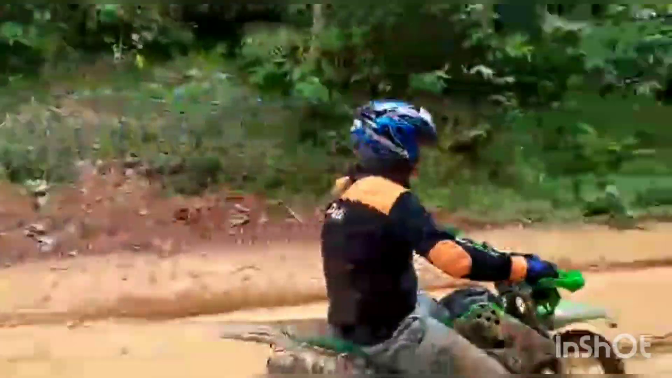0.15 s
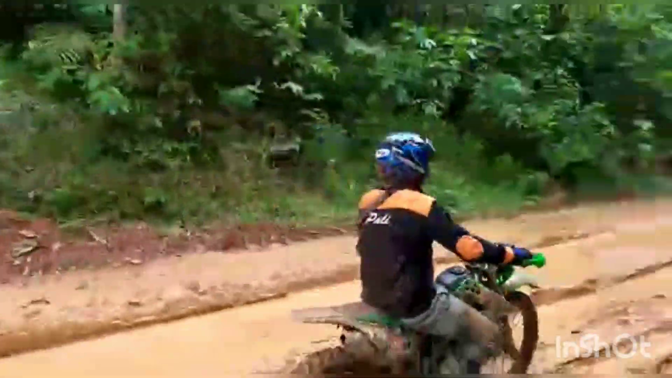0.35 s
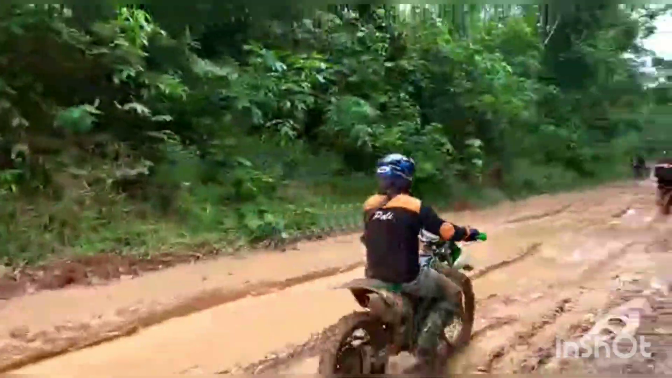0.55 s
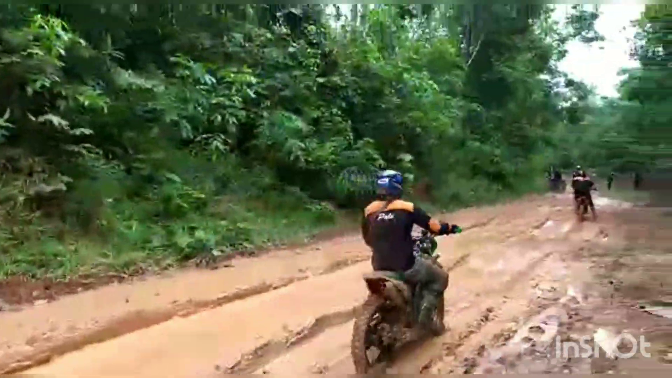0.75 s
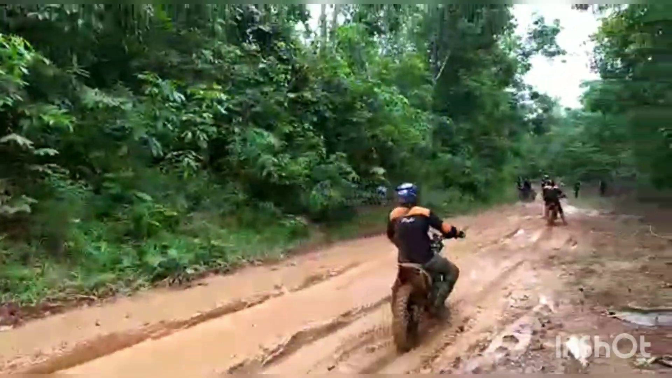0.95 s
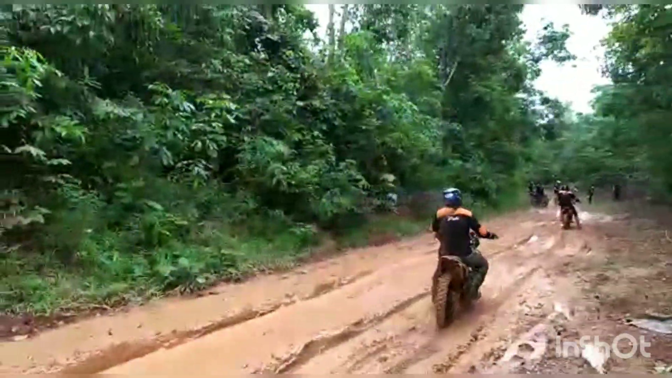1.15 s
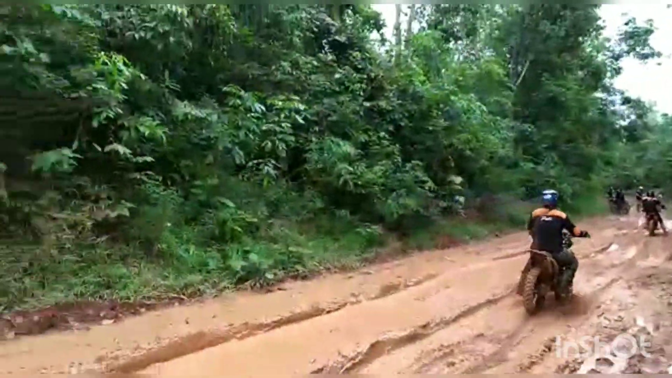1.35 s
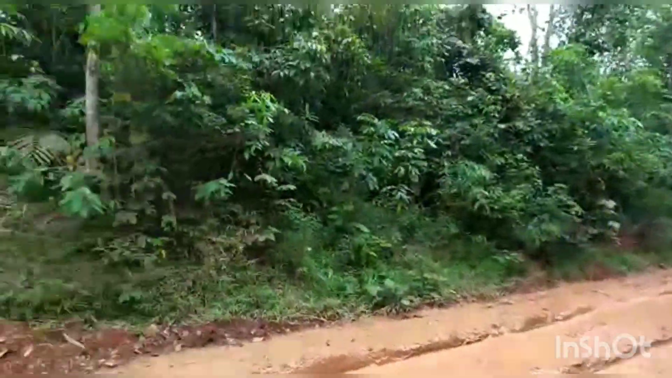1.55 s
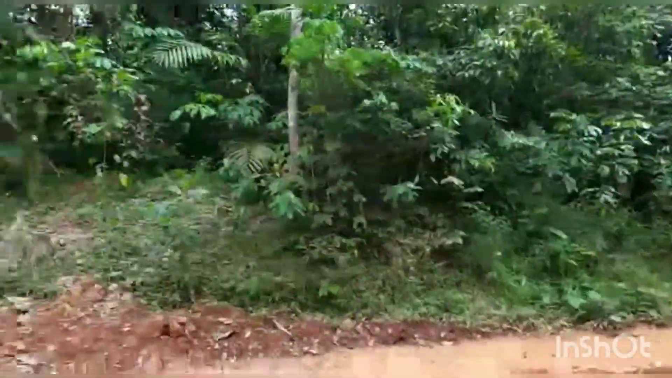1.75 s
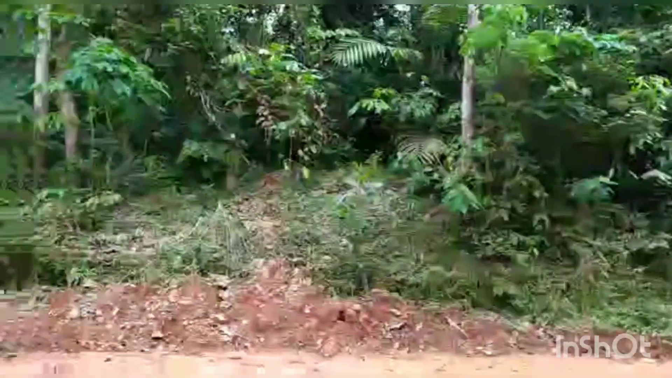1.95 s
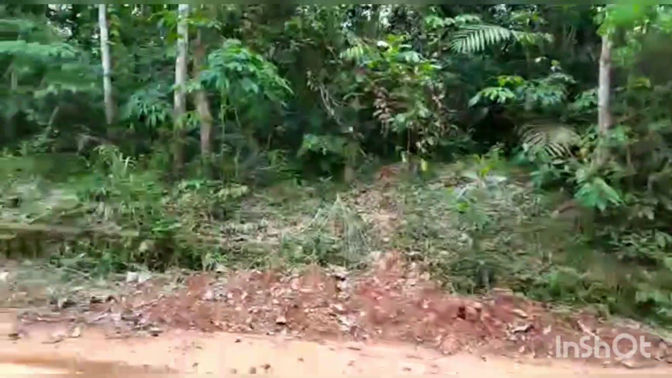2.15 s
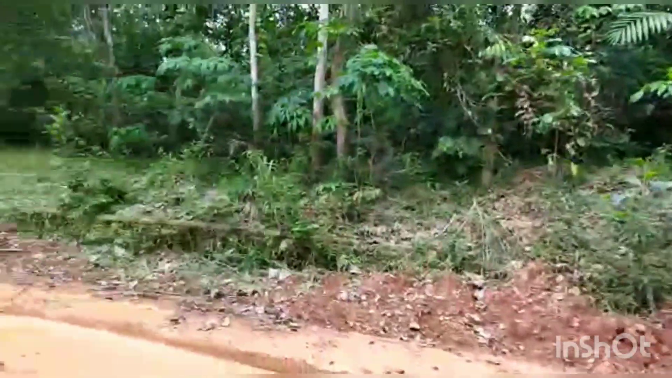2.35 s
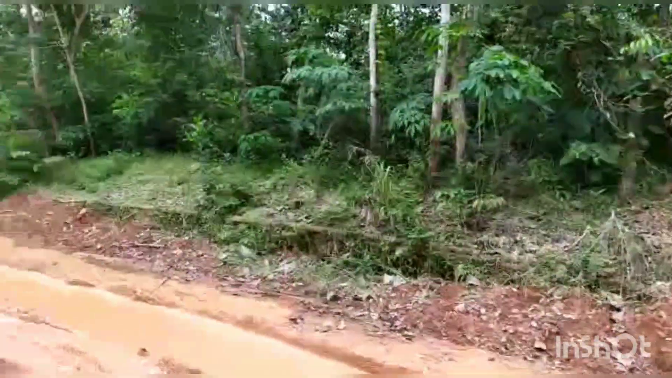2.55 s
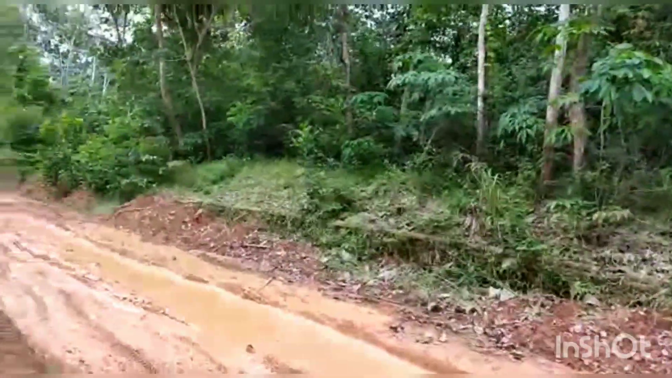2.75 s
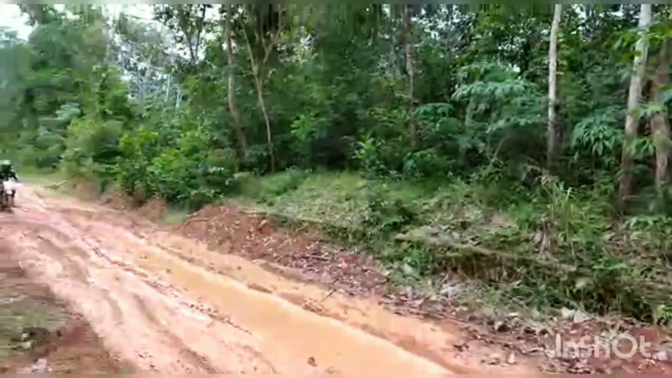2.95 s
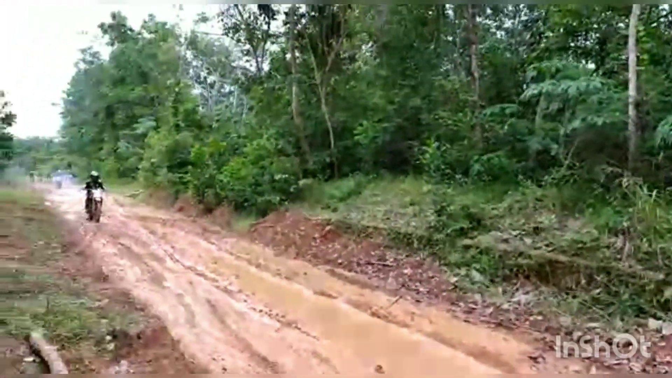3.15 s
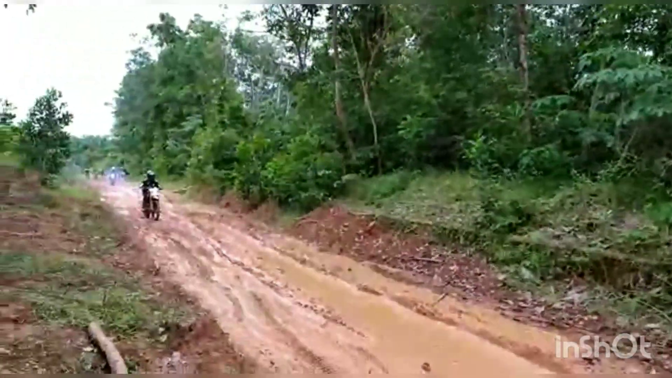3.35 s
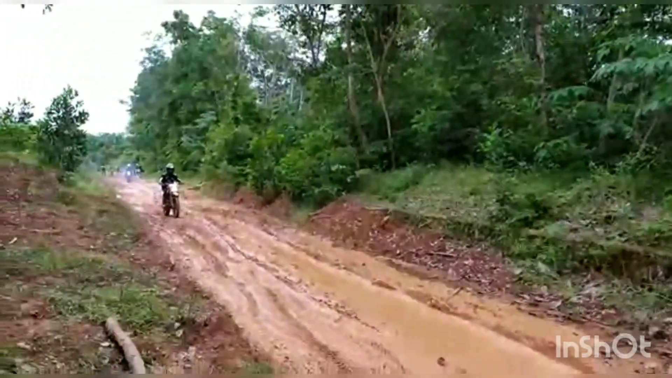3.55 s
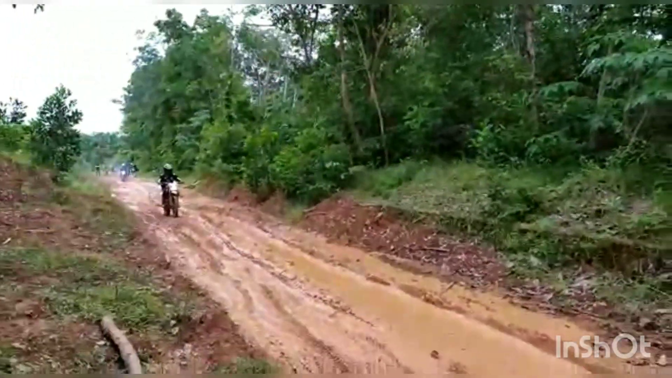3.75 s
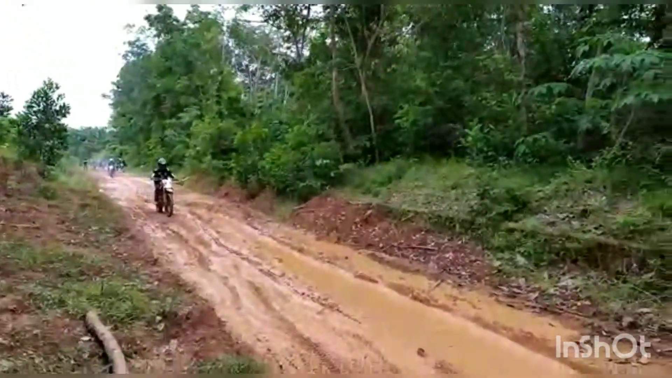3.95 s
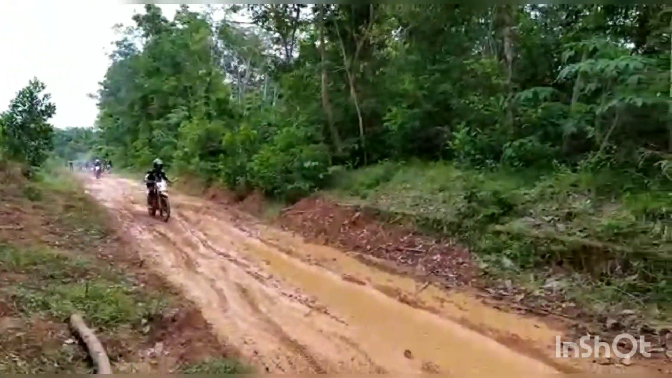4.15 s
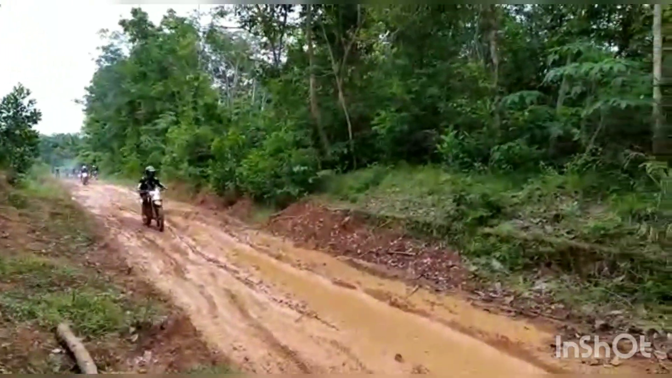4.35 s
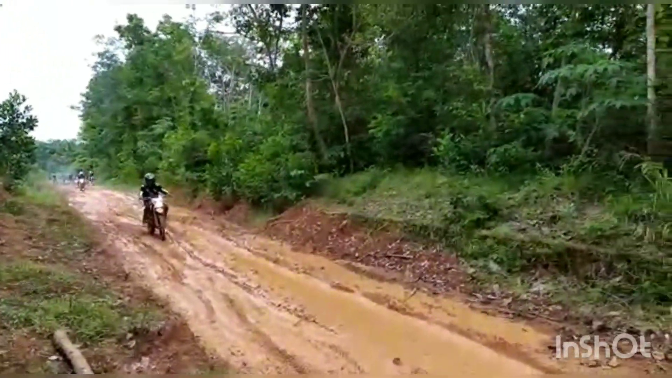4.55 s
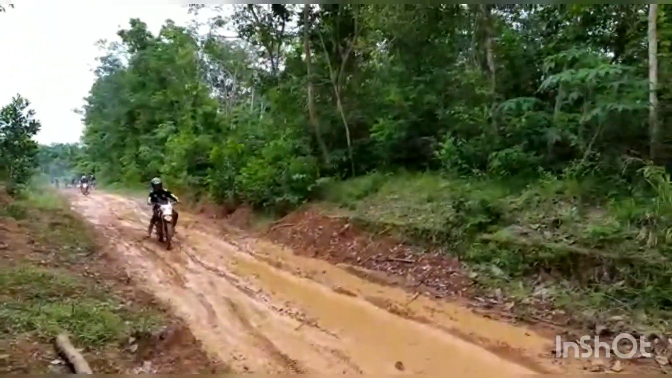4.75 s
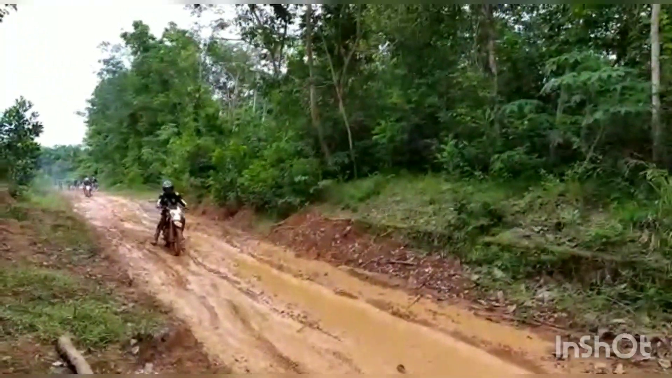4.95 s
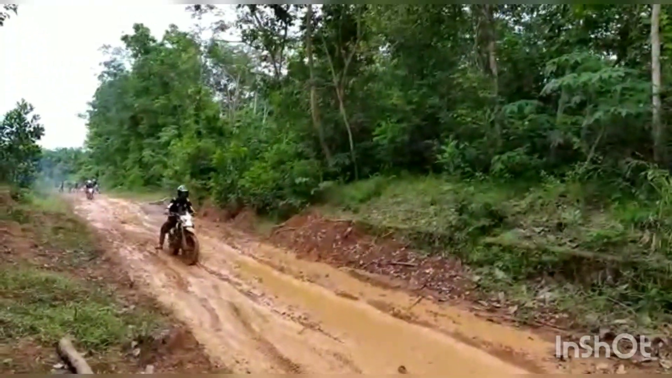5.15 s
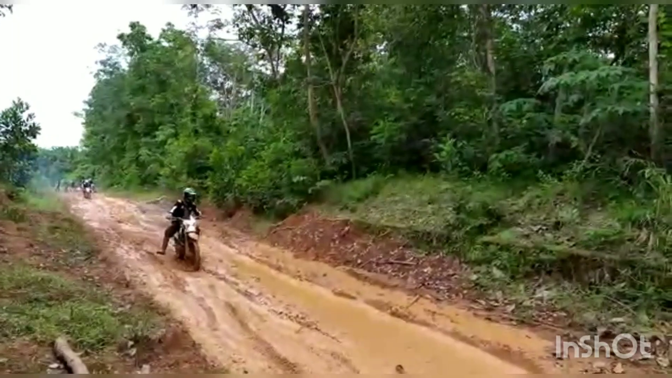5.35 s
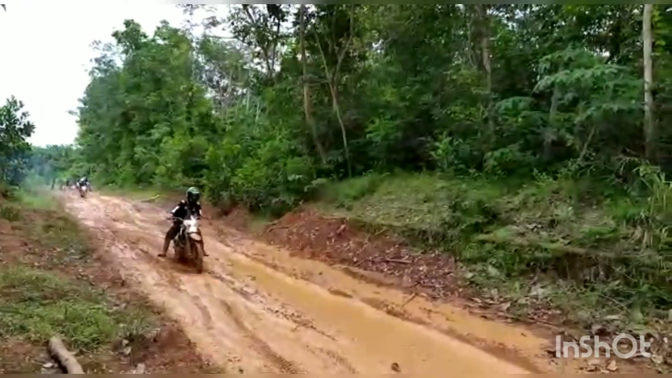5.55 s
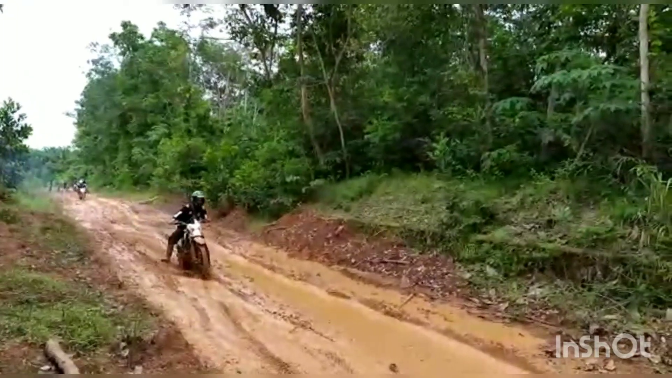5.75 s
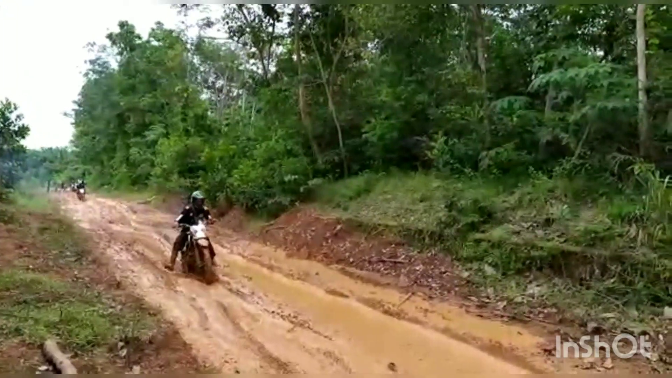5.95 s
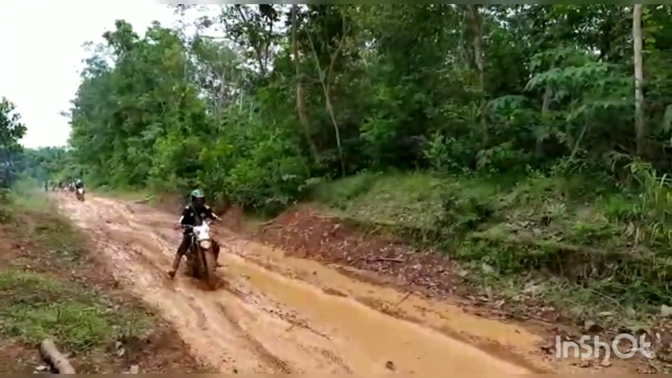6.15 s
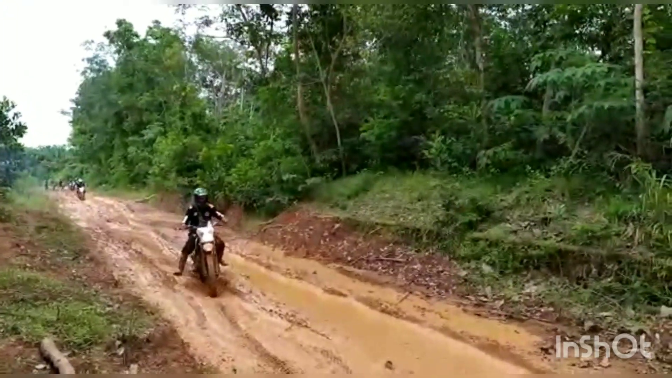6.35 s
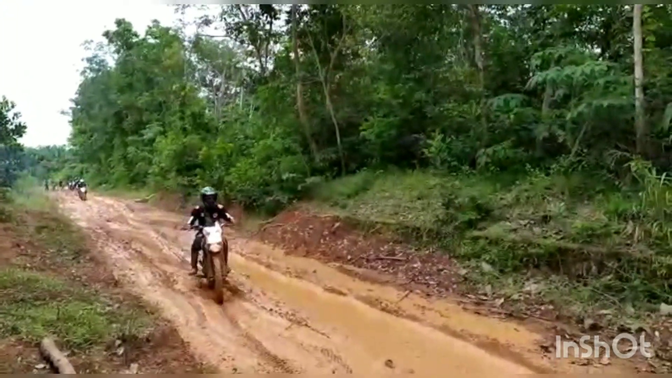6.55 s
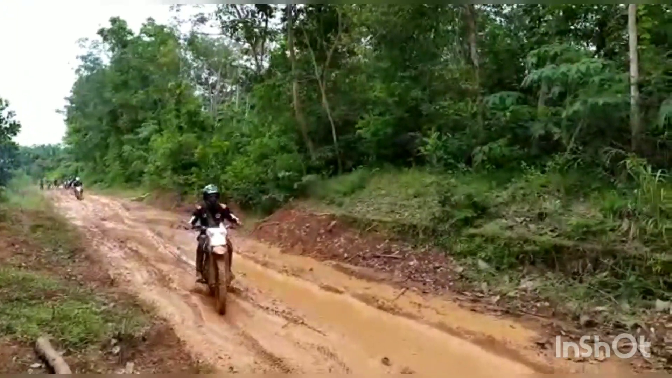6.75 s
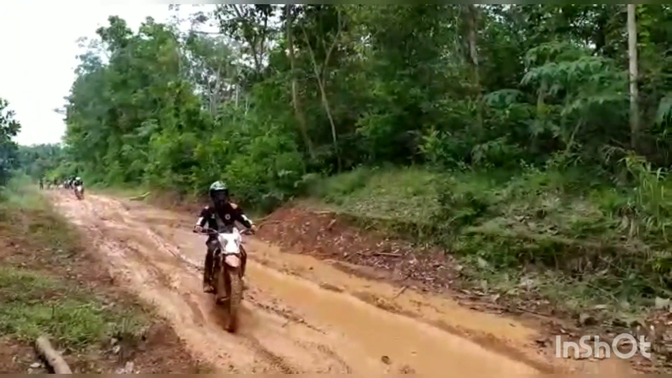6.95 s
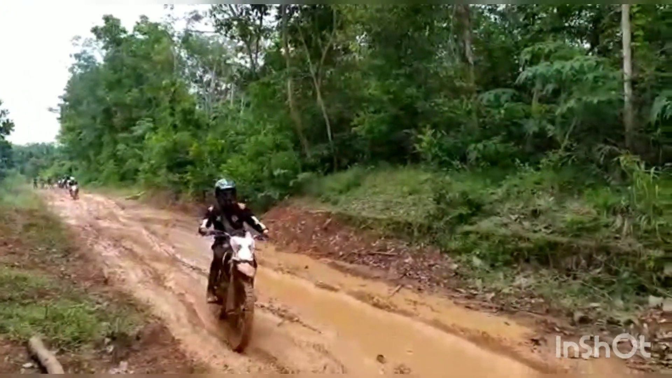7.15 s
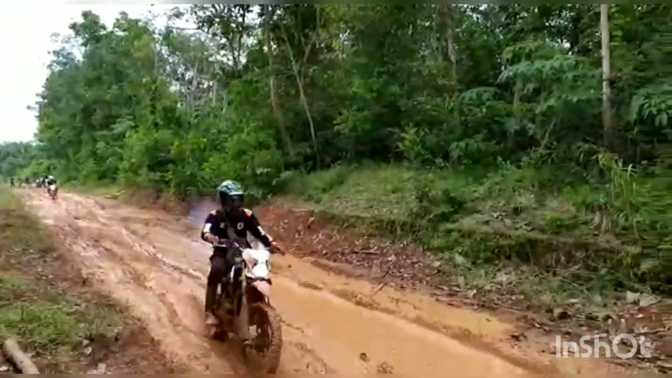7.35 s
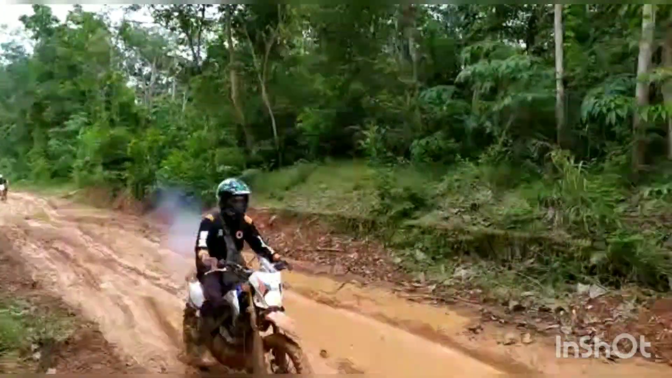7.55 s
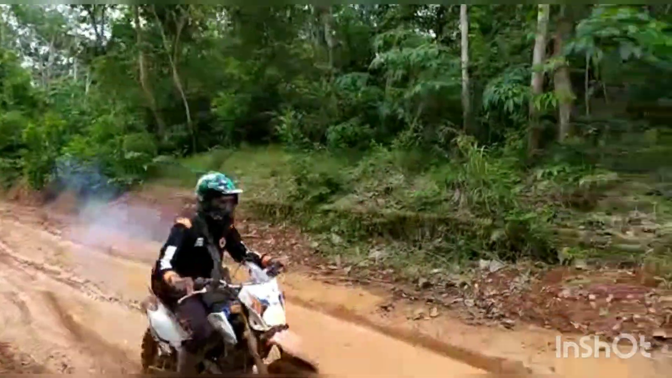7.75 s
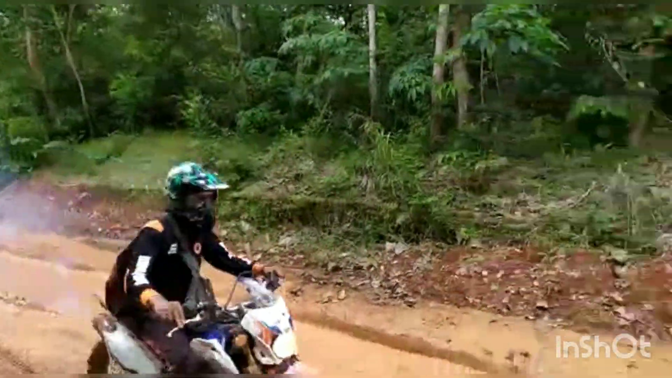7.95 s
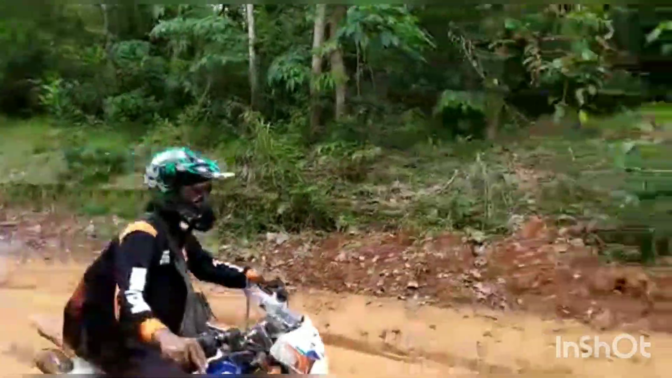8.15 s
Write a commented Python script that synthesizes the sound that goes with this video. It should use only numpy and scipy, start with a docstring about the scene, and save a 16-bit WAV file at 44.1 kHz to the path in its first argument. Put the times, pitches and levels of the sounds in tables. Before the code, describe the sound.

Outdoors on a wet forest track, a single-cylinder trail bike passes very close with a loud raspy bark, blips its throttle and pulls away. The engine sound thins to low puttering, with another engine faint up the track. A second bike approaches, stutters slowly, gives short throttle bursts, then revs up and passes near the microphone with clatter, hiss and muddy splashes.

```python
"""Trail bikes on a muddy forest track

Single-cylinder four-strokes heard from the verge: one rides off close by, blipping its throttle;
another putters nearer, opens up and passes, while a further engine putters up the track.
Each firing excites the resonances of silencer and pipe; shaped noise makes the clatter, wet mud and splashes."""
import sys
import numpy as np
from scipy import signal
from scipy.io import wavfile
from scipy.ndimage import uniform_filter1d

SR = 44100
rng = np.random.default_rng(int(sys.argv[2]) if len(sys.argv) > 2 else 0)


def bounce(signal):
    """Save signal as a 16-bit WAV file at the path given by the first command-line argument."""
    frames = np.transpose(np.atleast_2d(signal))
    limited = np.clip(frames, -1, 1)
    pcm = np.round(limited * 32767).astype(np.int16)
    wavfile.write(sys.argv[1], SR, pcm)


N = 361619

CRUISE_PER_S = 30  # firings per second at cruising speed


def from_db(db):
    """Decibels to gain."""
    return 10 ** (np.asarray(db) / 20)


def rms_one(x):
    """Scale to rms 1."""
    return x / np.sqrt(np.mean(x ** 2) + 1e-20)


def curve(rows):
    """Draw a (time, value) table as a line through every sample."""
    s, values = np.transpose(rows)
    return np.interp(np.arange(N) / SR, s, values)


def at_hz(points, hz):
    """Read a spectrum on a log-frequency axis."""
    points_hz, values = np.transpose(points)
    return np.interp(np.log(hz), np.log(points_hz), values)


def band(x, low_hz, high_hz, order=2):
    """Butterworth band-pass."""
    edges_hz = [low_hz, min(high_hz, .45 * SR)]
    return signal.sosfilt(signal.butter(order, edges_hz, "band", fs=SR, output="sos"), x + 1e-18)


def resonance(x, hz, width_hz):
    """Two-pole resonance with gain 1 on top."""
    r = np.exp(-np.pi * width_hz / SR)
    zeros = np.array([1, 0, -1]) * (1 - r * r) / 2
    poles = [1, -2 * r * np.cos(2 * np.pi * hz / SR), r * r]
    return signal.lfilter(zeros, poles, x + 1e-18)


def ringing(x, modes):
    """Parallel resonances of alternating sign, as along a pipe."""
    return sum((-1) ** k * from_db(db) * resonance(x, hz, width) for k, (hz, width, db) in enumerate(modes))


def drift(corner_hz):
    """Random wander with spread 1, smooth above the corner; computed at every 40th sample."""
    r = np.exp(-80 * np.pi * corner_hz / SR)
    slow = signal.lfilter([1], [1, -2 * r, r * r], rng.standard_normal(N // 40 + 2002))
    slow = rms_one(slow[2000:])  # skip the filter's run-in
    return np.interp(np.arange(N) / 40, np.arange(len(slow)), slow)


def delayed(x, seconds):
    """Shift a signal later in time, or earlier if negative."""
    return np.interp(np.arange(N) - seconds * SR, np.arange(N), x)


def evened(x, size=3500):
    """Hold the level at rms 1 over a few firings."""
    power = uniform_filter1d(uniform_filter1d(x * x, size), size)
    return x / np.sqrt(np.abs(power) + 1e-16)


# how alike the two ports hear noise: (frequency [Hz], left-right likeness [-1 to 1])
PORT_LIKENESS = [(60, .99), (290, .9), (640, 0.99), (1400, 0), (3100, 0), (15000, 0.067)]
# tilt of noise between the ports: (frequency [Hz], left minus right [dB])
PORT_BALANCE = [(700, 1), (1290, -1), (2380, 4), (4400, 3.5), (8120, -4.5), (11500, -11.5), (15000, -71)]


def stereo_noise(spectrum, patchy_db, count=9):
    """Bands of noise, each with its own flicker, likeness and balance between the ports; rms 1 in mono."""
    out, sides = 0, np.array([[1], [-1]])
    edges = np.geomspace(spectrum[0][0], spectrum[-1][0], count + 1)
    white = rng.standard_normal((2, 2, N))
    for k, (low, high) in enumerate(zip(edges, edges[1:])):
        mid, side = band(white[k % 2], low, high)  # neighbouring bands use different noise
        hz = np.sqrt(low * high)
        alike = np.clip(at_hz(PORT_LIKENESS, hz), -1, 1)
        pair = np.sqrt(1 + alike) * mid + np.sqrt(1 - alike) * side * sides
        balance = rms_one(from_db(sides * at_hz(PORT_BALANCE, hz) / 2))
        out = out + pair * balance * from_db(at_hz(spectrum, hz) + patchy_db * drift(17.5))
    return out / np.std(out.mean(axis=0))


# pace of whichever bike is nearest: (time [s], firing rate [1/s])
FIRING_RATE = [(0.0, 49.214), (0.274, 38.93), (0.437, 34.934), (0.549, 42.926), (0.677, 41.367),
               (0.84, 35.615), (1.08, 29.176), (1.331, 44.32), (1.556, 40.302), (1.966, 27.965),
               (2.17, 36.97), (2.3, 29.559), (2.597, 27.818), (2.78, 30.143), (3.111, 24.882),
               (3.344, 30.157), (3.465, 27.737), (3.937, 29.147), (3.945, 32.219), (4.591, 29.913),
               (5.079, 21.045), (5.441, 22.817), (6.09, 35.986), (6.271, 28.685), (6.514, 33.919),
               (7.069, 37.794), (7.271, 45.653), (7.477, 38.612), (7.916, 42.221), (7.995, 49.184),
               (8.2, 47.868)]


def engine_speed():
    """The nearest engine's firings per second, rising and falling with its revs."""
    return curve(FIRING_RATE)


def firings(cycle, speed, spread_db, jitter_s):
    """One click per firing; spread and jitter hold at 28 firings per second and grow on a slower engine."""
    at = np.flatnonzero(np.diff(np.floor(cycle)))
    chance = rng.uniform(-1, 1, (len(at), 2))
    uneven = np.minimum((28 / speed[at]) ** 4, 2)
    shift = (jitter_s * SR * uneven * chance[:, 0]).astype(int)
    clicks = np.zeros(N)
    clicks[np.clip(at + shift, 0, N - 1)] = from_db(spread_db * uneven * chance[:, 1])
    return clicks


def varied(clicks, spread_db):
    """No two charges burn alike: each firing gets a strength of its own."""
    return clicks * from_db(spread_db * np.tanh(rng.standard_normal(N)))


def gas_rush(clicks, decay_s):
    """The flow that follows each opening of the exhaust valve; height about 1."""
    return signal.lfilter([1], [1, -np.exp(-1 / (decay_s * SR))], clicks + 1e-18)


# twists of the throttle: (opens [s], closes [s], added bark [dB], added ring [dB], added rasp [dB], load [0-1])
THROTTLE_TWISTS = [(-0.05, 0.079, 9, 13.5, 7.5, 0.42), (0.484, 0.615, 5, 8, 9, 0.57),
                   (1.147, 1.466, 12.5, 9.5, 10.5, 0.64), (2.051, 2.28, 15.5, 7, 3, 0.67),
                   (2.736, 2.912, 6, 6, 9.5, 0.2), (3.29, 4.003, 12.5, 7, 0.5, 0.27),
                   (4.839, 4.89, 9.5, 3.5, 12, 0.5), (5.376, 5.512, 16.5, 7, 21, 0.36),
                   (5.624, 5.74, 14, 6, 14, .4), (5.922, 6.993, 7, 4, 6.5, 0.19),
                   (7.145, 7.412, 5.5, 5.5, 10, 0.3), (7.893, 8.25, 7.5, 9, 9, 0.42)]


def throttle():
    """Each twist snaps open and its charge dies away after it shuts; gives added bark, ring, rasp and load."""
    open_s, fade_s = 0.015, 0.0091  # length of the opening ramp; time constant of the fade
    t, out = np.arange(N) / SR, 0
    for opens, closes, *added in THROTTLE_TWISTS:
        opening = np.clip((t - opens) / open_s, 0, 1) * np.exp(-np.maximum(t - closes, 0) / fade_s)
        out = out + np.outer(added, opening)
    bark_db, ring_db, rasp_db, load = out
    return bark_db, ring_db, rasp_db, np.clip(load, 0, 1)


# one bike leaves, the other comes up: (time [s], nearness [dB])
NEARNESS_CURVE = [(0, -5.5), (.2, 4.5), (.7, -2.5), (1.08, -6.5), (2.0, -5.5), (2.5, -9.5), (3.6, -10.5),
                  (4.3, -12.5), (5.3, -15), (5.85, -17), (6.5, -5.5), (6.92, -4.5), (7.07, -5.5),
                  (7.35, -8.5), (7.53, -13.5), (7.7, -4.5), (8.2, -10.5)]


def nearness():
    """How strongly the pipe reaches the verge as the bikes come and go."""
    return curve(NEARNESS_CURVE)


def voice_db(near_db, speed, level_db, share, db_per_octave):
    """A voice of the pipe grows as the bike nears and as the engine turns faster than cruising speed."""
    return level_db + share * near_db + db_per_octave * np.log2(speed / CRUISE_PER_S)


# the silencer's boom, also a cue for other layers: (time [s], relative level [dB])
BOOM_CURVE = [(0.0, -11.5), (0.6, -10.5), (0.73, -11), (0.93, -18.5), (1.36, -20), (2.93, -23.5),
              (3.0, -18.05), (3.95, -30), (4.02, -25), (5.02, -22), (5.26, -28.79), (6.42, -23.5),
              (7.34, -14), (7.55, -17), (7.94, -7.5), (8.2, -14.5)]


def boom_level():
    """Ride of the silencer's boom in dB."""
    return curve(BOOM_CURVE)


def boom(clicks, lumpy, boom_db):
    """Firings set two low resonances of the silencer booming."""
    early = delayed(varied(clicks, 4.4 * lumpy), -0.00059)
    body = resonance(resonance(early, 65.0, 40), 85.8, 53.8)
    return from_db(boom_db - 3.0) * evened(-band(body, 65.3, 135.0))


def puffs(clicks, speed, hz, turns, lag_s):
    """Each firing is a smooth swing of pressure, shorter as the crank turns faster; hz is at cruising speed."""
    out, t = np.zeros(N + 2000), np.arange(-1000, 1000) / SR
    for i in np.flatnonzero(clicks):
        swing = (t - lag_s) * hz[i] * (speed[i] / CRUISE_PER_S) ** .36
        out[i:i + len(t)] += clicks[i] * np.exp(-(swing / turns) ** 2) * np.sin(2 * np.pi * swing)
    return out[len(t) // 2:][:N]


# firing thump: (time [s], relative level [dB])
THUMP_CURVE = [(0, -26), (.05, -38), (.1, -10.5), (.45, -12), (.6, -24), (0.658, -9.5), (1.2, -12),
               (1.68, -11.5), (2.02, -19), (2.74, -21.5), (3.05, -28), (3.851, -21.5), (4.15, -32.5),
               (5.05, -27.5), (5.2, -49), (5.44, -26), (5.68, -26), (5.85, -33.5), (6.1, -30),
               (6.25, -22.5), (7.25, -21), (7.5, -27.5), (8.2, -16.5)]
# centre of the thump at cruising speed without load: (time [s], frequency [Hz])
THUMP_PITCH = [(0, 150), (.7, 143), (1.1, 125.6), (1.55, 155.6), (2.6, 166), (4.3, 148), (6.5, 164),
               (8.2, 139)]


def thump(clicks, speed, load, lumpy):
    """Each firing pushes out one soft puff of pressure, quickened by 9.5 % at full load."""
    hz = curve(THUMP_PITCH) * (1 + 0.095 * load)
    swings = puffs(varied(clicks, 2.0 * lumpy), speed, hz, turns=0.768, lag_s=0.0038)
    return from_db(curve(THUMP_CURVE) - 2.5) * evened(swings)


# lowest exhaust resonances: (centre [Hz], width [Hz], relative level [dB])
BARK_MODES = [(225, 71, 1), (312, 137, -3.5)]


def bark(ragged, bark_db):
    """Low exhaust resonances, all of one sign, give each firing its bark."""
    modes = sum(from_db(db) * resonance(ragged, hz, width) for hz, width, db in BARK_MODES)
    return from_db(bark_db + 2.38) * evened(-band(delayed(modes, -0.0015), 207.0, 438, order=3))


# middle pipe resonances: (centre [Hz], width [Hz], relative level [dB])
RING_MODES = [(419.4, 43, 8), (512.4, 74, 0.5), (588, 124, -3.5)]


def ring(ragged, ring_db):
    """The middle resonances of the pipe ring after each firing."""
    modes = ringing(varied(ragged, spread_db=3.9), RING_MODES)
    return from_db(ring_db + 2.4) * evened(band(modes, 420, 653))


# upper pipe resonances: (centre [Hz], width [Hz], relative level [dB])
RASP_MODES = [(672, 81, 9.5), (863, 42, 7.5), (960, 78, -0.5), (1345, 66, 7.5), (1380, 220, -1),
              (1980, 390, -16.5)]


def rasp(ragged, turbulence, rasp_db):
    """Turbulent gas roughens the pipe's upper resonances into a rasp."""
    modes = ringing(ragged + 0.0043 * turbulence, RASP_MODES)
    return from_db(rasp_db - 2.5) * evened(band(modes, 320, 2250))


def valve_front(clicks, load, ring_db, rasp_db):
    """The steep pressure front as the valve opens cracks harder under load."""
    crack = band(gas_rush(clicks, decay_s=0.00083), 345, 2000, order=1)
    return from_db((rasp_db + ring_db) / 2 - 11.0 + 10 * load) * evened(crack)


def exhaust(clicks, speed, load, lumpy, boom_db, bark_db, ring_db, rasp_db):
    """Firings boom and thump in the silencer; the ragged gas pulses make the pipe bark, ring and rasp."""
    # with the throttle shut, the valve closing a quarter cycle later gives a second, weaker pulse
    closing = 0.37 * (1 - load) * delayed(clicks, 0.2617 / speed)
    turbulence = gas_rush(clicks, decay_s=.006) * rng.standard_normal(N)
    ragged = varied(clicks, spread_db=1 + lumpy) + closing + .009 * turbulence
    low = boom(clicks, lumpy, boom_db) + thump(clicks, speed, load, lumpy)
    pipe = bark(ragged, bark_db) + ring(ragged, ring_db) + rasp(ragged, turbulence, rasp_db)
    return low + pipe + valve_front(clicks, load, ring_db, rasp_db)


# bearing of the bike as the microphone turns: (time [s], lead of the right port over the left [s])
BEARING = [(0, .0001), (1.2, .0002), (2.1, -.00035), (2.7, -.0003), (3.2, -.00013), (4.2, -.00009),
           (4.7, .00018), (7.2, .00018), (7.7, .00032), (8.2, .00014)]


def ports(x):
    """Sound from one side reaches one port before the other."""
    lead_s = curve(BEARING)
    return np.array([delayed(x, lead_s / 2), delayed(x, -lead_s / 2)])


def forest(x, level_db, t60):
    """Trunks and the bank scatter a short, dull tail, different at each port."""
    t = np.arange(SR // 2) / SR
    mid, side = rng.standard_normal((2, len(t))) * from_db(-60 * t / t60) * (t > .008)
    tail = band(mid, 126, 1600, order=1) + 1.8 * band(side, 520, 1500, order=1) * [[1], [-1]]
    tail = tail * from_db(level_db) / np.sqrt(np.sum(mid ** 2))
    return signal.fftconvolve(x[None], tail, axes=1)[:, :N]


# hiss before the throttle adds to it: (time [s], relative level [dB])
HISS_CURVE = [(0, -25.5), (.25, -31.5), (.55, -26.5), (.9, -34.5), (1.35, -32.5), (2.1, -42), (2.75, -43),
              (3.902, -48), (4.23, -51.5), (4.46, -46), (5.14, -45), (5.22, -41), (5.4, -41), (6.2, -39),
              (6.6, -35), (7.1, -34), (7.22, -29), (7.53, -32), (7.99, -27), (8.2, -35)]


def hiss_level(added_ring_db):
    """Ride of the hiss in dB, lifted by a share of the throttle's added ring."""
    return curve(HISS_CURVE) + 0.39 * added_ring_db


# mechanical clatter: (frequency [Hz], relative level per Hz [dB])
CLATTER_SPECTRUM = [(600, -1), (950, 2), (1250, -1.5), (1600, 2.5), (2300, 2.5), (3400, 0), (4600, -2.5),
                    (6000, -23.5)]
# wet tyre spray: (frequency [Hz], relative level per Hz [dB])
SPRAY_SPECTRUM = [(4000, -8.5), (5200, 1.5), (6300, 0), (7500, 0.5), (10000, -2.5), (12500, -6),
                  (15500, -15.5)]


def hiss(clicks, cycle, load, hiss_db, spray_db):
    """Clatter and wet tyres hiss steadily; under load a blast of gas at each firing deepens the pulsing."""
    blast = gas_rush(clicks, decay_s=.005) * (.4 + 2.6 * load)
    piston = 1 + 0.0243 * np.cos(4 * np.pi * cycle)  # two crank turns per firing
    pulsing = evened(np.sqrt(piston ** 2 + blast ** 2))
    clatter_gain = from_db(hiss_db - 1.0 + 0.277 * drift(264))
    clatter = clatter_gain * stereo_noise(CLATTER_SPECTRUM, patchy_db=2.0)
    spray_gain = from_db(hiss_db + spray_db + 0.54 * drift(450))
    spray = spray_gain * stereo_noise(SPRAY_SPECTRUM, patchy_db=1.5, count=7)
    return pulsing * (clatter + spray)


def valve_ticks(clicks, load, hiss_db):
    """Under load each firing starts with a short, bright tick of noise."""
    burst = gas_rush(varied(clicks, spread_db=3), decay_s=.0016)
    white = rng.standard_normal((2, N))
    body = rms_one(band(white, 700, 3500, order=1))
    edge = rms_one(band(white, 6000, 12000)) * from_db([[-5], [1]])  # brighter on the right
    return from_db(hiss_db + 5.5) * load * burst * (body + edge)


def casing(cycle, boom_db, hiss_db):
    """Cylinder fins and chain add a bright zing twice per firing, at a pitch of its own on each bike."""
    near = np.clip((boom_db + 26.5) / 8, 0, 1)
    # from 4.1 s the approaching bike is the nearer one; it takes over within 0.1 s
    coming = np.clip((np.arange(N) / SR - 4.1) * 10, 0, 1)
    shaken = 1 + 0.22 * np.cos(4 * np.pi * cycle)
    white = rng.standard_normal((2, N))
    first = near * (1 - coming) * from_db(-5.0) * rms_one(band(white, 2880, 3820))
    second = coming * from_db(-11.5 + 4.4 * near) * rms_one(band(white, 3800, 5000))
    tilt_db = np.array([[1.5], [-1.5]])
    return from_db(hiss_db + 4.4 * np.tanh(drift(56)) + tilt_db) * shaken * (first + second)


def outflow(load, boom_db):
    """The tailpipe jet is a very narrow noise band near 50 Hz, stronger close by and under load."""
    near = np.clip((boom_db + 21) / 15, 0, 1)
    rumble = rms_one(band(rng.standard_normal(N), 49.7, 49.8, order=3))
    return from_db(boom_db - 46 + 6.6 * load + 10 * near) * rumble


def air_eddies(boom_db):
    """Air eddies rumble separately at each port, following the boom."""
    gusts = rms_one(band(rng.standard_normal((2, N)), 60, 206, order=1))
    return from_db(boom_db - 23) * gusts


def far_bike(level_db):
    """Another engine putters further up the track, its firings ringing two low resonances."""
    speed = 27 * np.exp(.12 * drift(0.94))
    clicks = firings(np.cumsum(speed) / SR, speed, spread_db=2.0, jitter_s=.001)
    return from_db(level_db) * rms_one(resonance(resonance(clicks, 80.0, 55), 97, 120))


# tyres through puddles: (time [s], half length [s], relative level [dB])
SPLASH_TIMES = [(0.402, 0.072, -30.5), (0.802, 0.036, -38), (7.582, 0.18, -32.5), (7.797, 0.065, -29.5)]
# colour of a splash: (frequency [Hz], relative level per Hz [dB])
SPLASH_SPECTRUM = [(1800, -21), (3200, 4.5), (5000, -3), (9000, -7), (14000, -7)]


def splashes():
    """Muddy water thrown up by a tyre: flickering noise that swells and falls away."""
    t = np.arange(N) / SR
    swell = sum(from_db(db) * np.exp(-((t - s) / half_s) ** 2) for s, half_s, db in SPLASH_TIMES)
    return swell * from_db(2.0 * drift(300)) * stereo_noise(SPLASH_SPECTRUM, patchy_db=2, count=5)


# sharp ticks from the bikes, like grit on metal: (time [s], relative level [dB])
GRIT_TICKS = [(3.9494, -19), (6.0256, -27), (6.836, -24), (7.0234, -16), (7.9478, -14)]


def grit(level_db, decay_s):
    """Short bright ticks: decaying bursts of high noise."""
    clicks = np.zeros(N)
    for s, db in GRIT_TICKS:
        clicks[round(s * SR)] = from_db(db + level_db)
    return gas_rush(clicks, decay_s) * band(rng.standard_normal((2, N)), 4300, 14000)


def scene():
    """The near engine with its echoes, its hiss, and the track beyond."""
    speed, near_db, boom_db = engine_speed(), nearness(), boom_level()
    added_bark_db, added_ring_db, added_rasp_db, load = throttle()
    # close by the firings are more even; further off they waver
    lumpy = 0.65 + np.clip((-8.5 - near_db) * 2.3, 0, 1)
    bark_db = added_bark_db + voice_db(near_db, speed, level_db=-31.5, share=0.93, db_per_octave=7.3)
    ring_db = added_ring_db + voice_db(near_db, speed, level_db=-32, share=1.15, db_per_octave=9.7)
    rasp_db = added_rasp_db + voice_db(near_db, speed, level_db=-42, share=0.89, db_per_octave=23.8)
    hiss_db = hiss_level(added_ring_db)
    spray_db = -4.5 + 0.067 * added_bark_db  # wet spray against the clatter
    cycle = .709 + np.cumsum(speed) / SR  # counts firings; starts part-way to the first
    clicks = firings(cycle, speed, spread_db=.7, jitter_s=.0005)
    pipe = exhaust(clicks, speed, load, lumpy, boom_db, bark_db, ring_db, rasp_db)
    engine = ports(pipe) + forest(pipe, level_db=-15.5, t60=.25)
    bright = hiss(clicks, cycle, load, hiss_db, spray_db) + valve_ticks(clicks, load, hiss_db)
    bright = bright + casing(cycle, boom_db, hiss_db)
    air = outflow(load, boom_db) + air_eddies(boom_db)
    return engine + bright + air + far_bike(level_db=-32) + splashes() + grit(level_db=-8, decay_s=.0015)


def record(dry):
    """Peaks are rounded towards full scale, and the top is cut above 15550 Hz."""
    rounded = dry / (1 + dry ** 4) ** (1 / 4)
    return signal.sosfilt(signal.ellip(10, .2, 80, 15550, fs=SR, output="sos"), rounded)


dry = scene()
out = record(dry)
bounce(out)
```